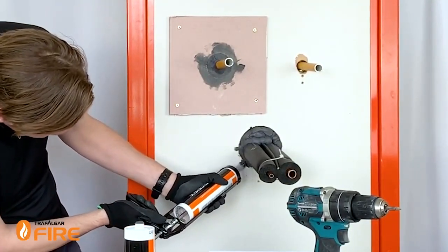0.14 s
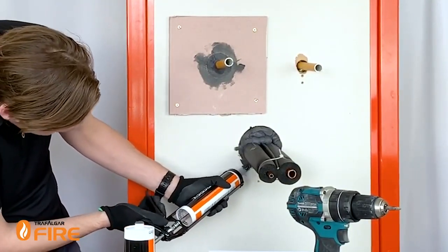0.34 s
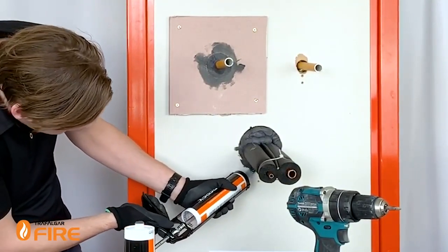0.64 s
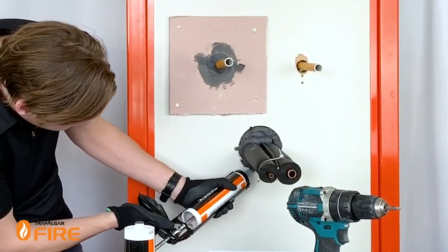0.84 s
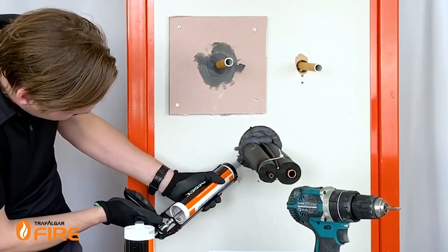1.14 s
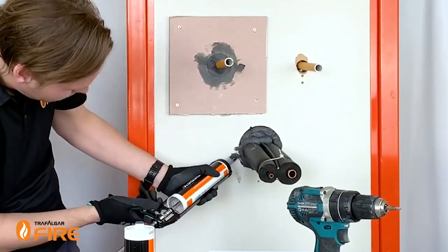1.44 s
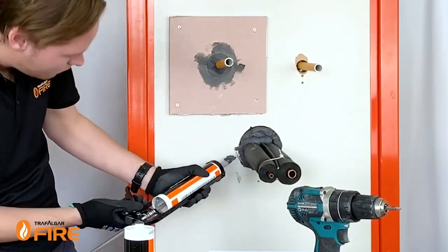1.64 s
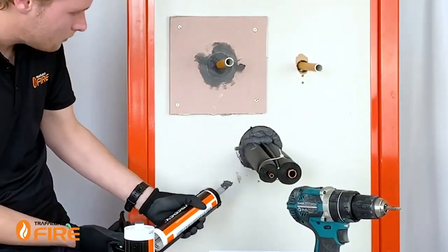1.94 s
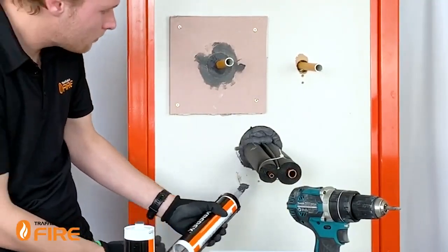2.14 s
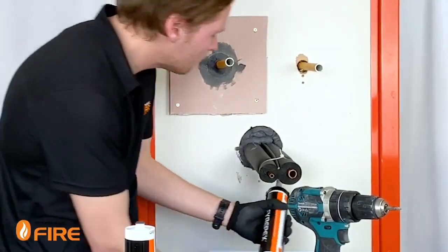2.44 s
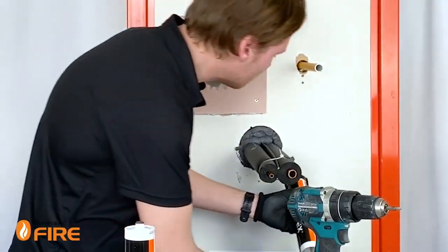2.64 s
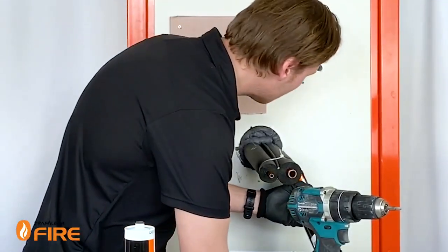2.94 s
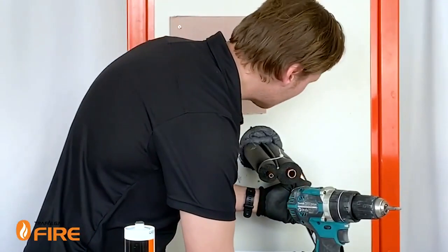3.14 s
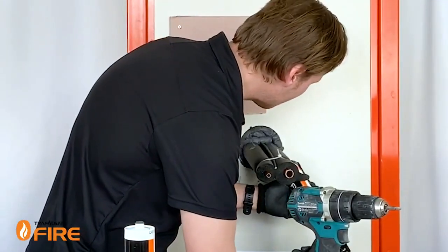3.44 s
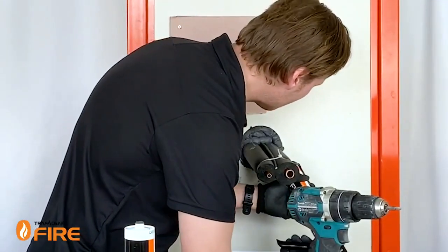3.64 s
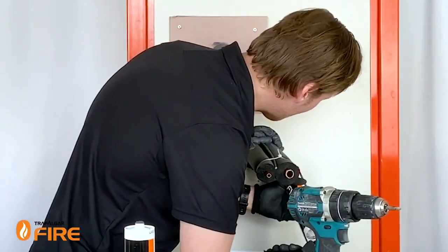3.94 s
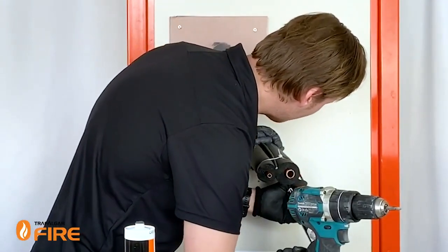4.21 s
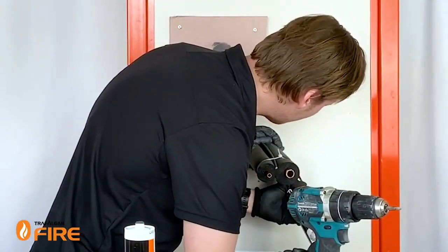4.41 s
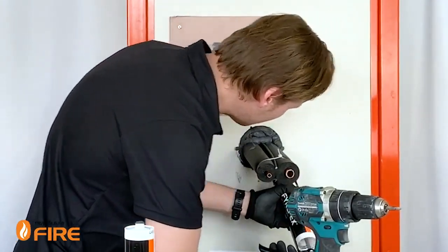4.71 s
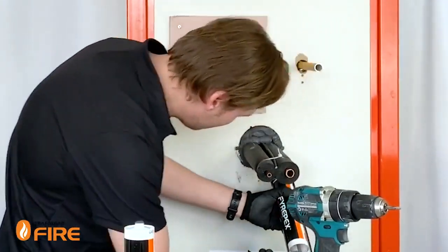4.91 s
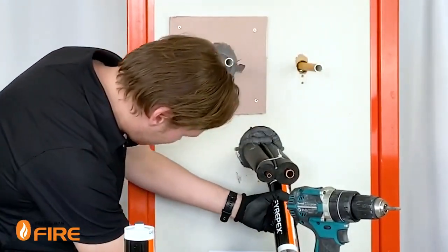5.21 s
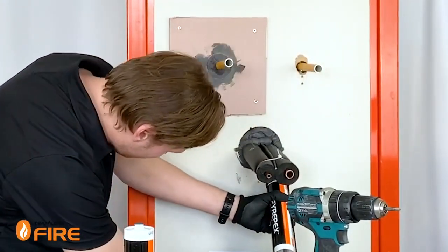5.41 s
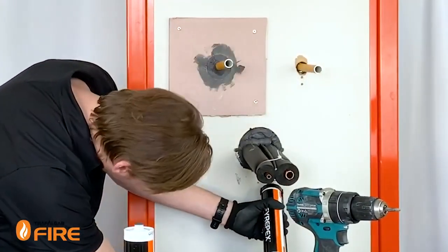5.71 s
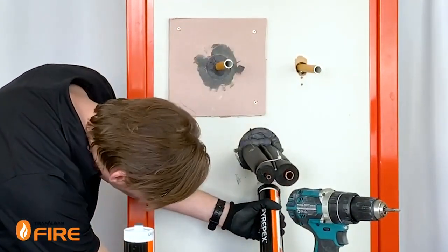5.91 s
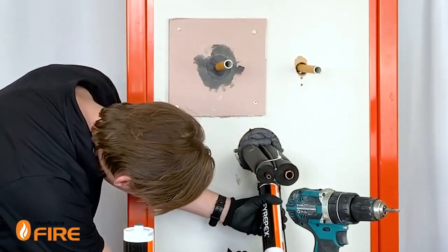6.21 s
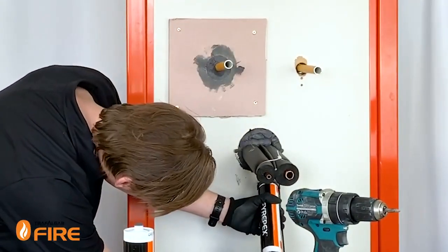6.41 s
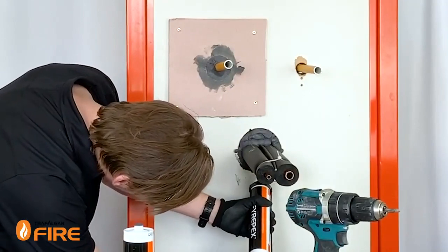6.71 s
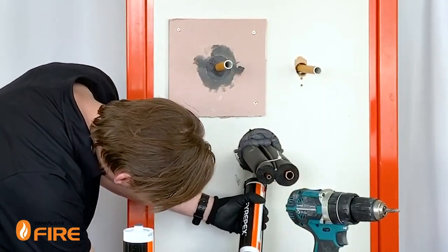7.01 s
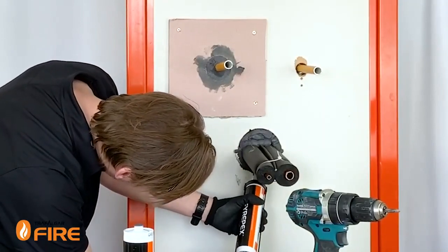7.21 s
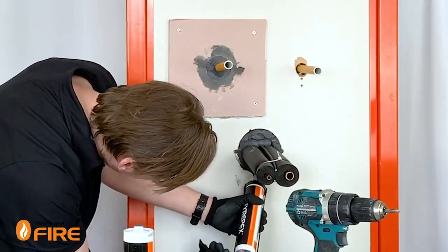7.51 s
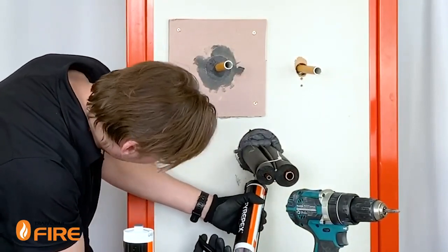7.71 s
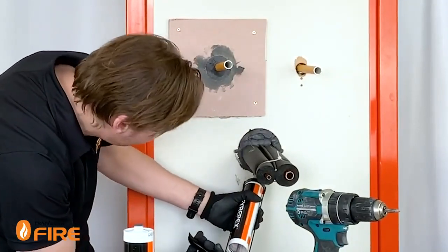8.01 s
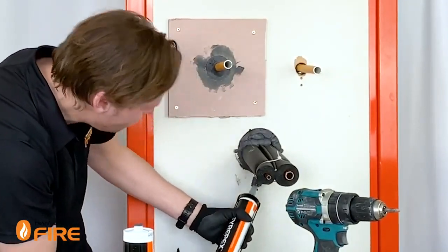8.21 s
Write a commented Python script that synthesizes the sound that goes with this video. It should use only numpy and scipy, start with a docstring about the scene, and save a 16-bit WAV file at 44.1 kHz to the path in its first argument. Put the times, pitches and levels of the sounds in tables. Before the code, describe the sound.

In a small, hard-walled workspace, a caulking gun's trigger is let go seven times; each time the steel plate skips back in two to five rapid bright clacks with a jangling metal ring. Soft glove scuffs, finger taps and rubs fill the gaps, with a dull footfall and dry knock early on. Faint ventilation rumble and hum continue beneath. The stereo microphone is close, with short room reflections.

```python
"""A hand caulking gun is squeezed and let go seven times in a small, hard-walled workspace.
At each release the trigger eases, then the spring drives the steel catch plate back along the rod in
uneven skips, to its stop: bursts of noise strike the gun's resonances, its jangling frame and steel rings.
Between releases filtered noise makes glove scuffs, taps and rubs; a gliding tone makes the rod's squeak.
Decaying modes make a footfall, a rattling burst a soft knock; shaped noise and hum make the ventilation."""
import sys
import numpy as np
from scipy import signal
from scipy.fft import rfft, irfft, next_fast_len
from scipy.io import wavfile
from scipy.ndimage import uniform_filter1d

SR = 44100
rng = np.random.default_rng(int(sys.argv[2]) if len(sys.argv) > 2 else 0)


def to_wav(sig):
    """Store sig (one row per channel, or 1-D mono) as 16-bit WAV at the path in sys.argv[1].

    Samples outside -1..1 are clipped; the rate is SR.
    """
    pcm = np.clip(np.atleast_2d(sig), -1, 1) * 32767
    pcm = np.round(pcm).astype(np.int16)
    wavfile.write(sys.argv[1], SR, pcm.T)  # frames by channels


N = 368235

# the releases; the grip and the rod's travel shift the gun's resonances from one to the next:
# [t/s, cartridge f/Hz, nozzle f/Hz, frame f/Hz, rod f/Hz, catch plate f/Hz, body level below 2 kHz/dB]
RELEASES = [(0.373, 1515, 1308, 3490, 7210, 10000, -2.5), (1.436, 984, 1688, 3606, 8000, 10780, -5),
            (3.678, 1390, 1140, 4350, 7750, 14200, 0), (4.685, 1425, 980, 3807, 7880, 12500, -2),
            (6.183, 885, 1580, 3540, 7000, 12300, -1.5), (7.432, 890, 1340, 3500, 7400, 13360, -1),
            (7.966, 880, 1830, 2900, 7780, 11250, 1.5)]


def amp(db):
    """Decibels to an amplitude factor."""
    return 10 ** (np.asarray(db) / 20)


def evened(x):
    """The same sound at rms 1."""
    return x / np.sqrt(np.mean(x ** 2) + 1e-20)


def read(points, hz):
    """A spectrum joined by straight lines on a log-frequency axis."""
    f, value = np.transpose(points)
    return np.interp(np.log(hz + 1), np.log(f + 1), value)


def add(mix, s, sound):
    """Lay a sound into the mix at s seconds, cut off at the end of the mix."""
    part = mix[max(round(s * SR), 0):][:len(sound)]
    part += sound[:len(part)]


def causal(gain_db):
    """The quickest (minimum-phase) impulse response with this gain curve, energy 1."""
    log_gain = np.log(amp(np.maximum(gain_db, gain_db.max() - 90)))
    circle = np.concatenate([log_gain, log_gain[-2:0:-1]])
    spectrum = np.exp(np.conj(signal.hilbert(circle)))
    taps = np.fft.ifft(spectrum).real[:len(gain_db)]
    return taps / np.linalg.norm(taps)


def hump(centre_hz, octaves):
    """Impulse response of one resonance, 3 dB down at the given spread to either side."""
    hz = np.fft.rfftfreq(2048, 1 / SR) + 1
    gain_db = -3 * (np.log2(hz / centre_hz) / octaves) ** 2
    return causal(np.maximum(gain_db, -50))


def ring(hz, db, t60):
    """One mode: a sine that dies by 60 dB in t60 seconds."""
    t = np.arange(SR // 3) / SR
    return amp(db) * np.exp(-np.log(1000) * t / t60) * np.sin(2 * np.pi * hz * t)


def contact(length_s):
    """Surfaces chatter for an instant as they meet: a short noise burst with an even spectrum."""
    t = np.arange(512) / SR
    shape = np.exp(-(t / length_s) ** 4)
    burst = rng.standard_normal(len(t)) * shape
    for _ in range(3):  # flatten the spectrum, then restore the shape in time
        burst = irfft(np.exp(1j * np.angle(rfft(burst)))) * shape
    return burst / np.linalg.norm(burst) * np.sqrt(length_s * SR)  # rms 1 over its length


def strike(contact_s=.0027, rattle_db=-7, rattle_s=0.01, rattles_per_s=1100):
    """Force of one strike: the landing, then a dying rattle of loose parts."""
    t = np.arange(SR // 8) / SR
    blow = contact(contact_s)
    hits = rng.standard_normal(len(t)) * (rng.random(len(t)) < rattles_per_s / SR)
    rattle = hits * np.exp(-t / rattle_s) * (t > contact_s)
    # the rattle's energy is set relative to the landing's
    force = amp(rattle_db) * rattle * np.linalg.norm(blow) / (np.linalg.norm(rattle) + 1e-9)
    add(force, 0, blow)
    return force


def swell(start_s, end_s, db, ramp_s):
    """Rise, hold and fall, in dB."""
    t = np.arange(N) / SR
    return db * np.clip(np.minimum(t - start_s, end_s - t) / ramp_s + .5, 0, 1)


def drifting(x, patch_db=3.0):
    """The air noise wavers: narrow bands swell and fade, each for a fraction of a second."""
    z = signal.stft(x, SR, nperseg=2048)[2]
    patches = uniform_filter1d(rng.standard_normal(z.shape[1:]), size=3, axis=0)  # across frequency
    patches = evened(uniform_filter1d(patches, size=9, axis=1))  # across time
    return signal.istft(z * amp(patch_db * patches), SR, nperseg=2048)[1][:, :N]


def ventilation(air_db=-44, waver=0.27, waver_hz=4, rumble_top_hz=250, balance_db=0.4):
    """Duct rumble that swells with the fans, a thin air hiss, and wavering fan hum."""
    # colour of the air noise: [f/Hz, relative level/dB]
    air_colour = [(20, -18), (42, -3.5), (60, -1.5), (115, -5), (165, -7.5), (230, -14.5), (330, -22),
                  (470, -23), (700, -34.5), (1270, -29), (1440, -22.5), (1620, -35.5), (2400, -33.5),
                  (3000, -48), (9000, -50.5), (15000, -58)]
    # how alike the air noise is at left and right: [f/Hz, likeness/1]
    air_likeness = [(50, 0.91), (130, 0.8), (290, 0.71), (640, 0.11), (1400, 0.0037)]
    # the fans' hum lines, each swelling once:
    # [f/Hz, steady level/dB, swell start t/s, swell end t/s, swell level/dB, ramp t/s]
    hum_lines = [(78.7, -57, 1.7, 3.3, 12.5, .94), (117.6, -54, 5.2, 6.1, 10, 0.24),
                 (165, -61, 7.82, 8.12, 14, .12), (55.2, -57.5, 7.9, 8.4, 7.5, .2)]
    rumble_share = 0.24  # the duct rumble takes this share of each swell's dB

    n = next_fast_len(N, True)
    hz, t = np.fft.rfftfreq(n, 1 / SR), np.arange(N) / SR
    left, other = rfft(rng.standard_normal((2, n)))
    same = np.clip(read(air_likeness, hz), -1, 1)
    right = same * left + np.sqrt(1 - same ** 2) * other
    z = np.array([left, right]) * amp(read(air_colour, hz)) * (hz > 12)
    air = irfft(z, n)[:, :N]
    rumble = irfft(z / (1 + (hz / rumble_top_hz) ** 4), n)[:, :N]
    swells_db = [swell(*row[2:]) for row in hum_lines]
    extra = amp(rumble_share * sum(swells_db)) - 1
    air = amp(air_db) * evened(drifting(air + rumble * extra))
    for (line_hz, steady_db, *_), swell_db in zip(hum_lines, swells_db):
        a, b = rng.standard_normal((2, 256))
        drift = np.interp(t * 2 * waver_hz, np.arange(len(a)), a + 1j * b)
        hum = ((1 + waver * drift) * np.exp(2j * np.pi * line_hz * t)).real
        air += amp(steady_db + swell_db) * evened(hum)
    return air * amp([[-balance_db], [balance_db]])


def footfall():
    """Heel and sole set the floor's modes ringing, each at another spot, so with other signs."""
    # heel and sole landing; a softer landing rolls off lower: [t/s, level/dB, roll-off f/Hz]
    landings = [(2.321, -38, 890), (2.329, -33, 600), (2.345, -26, 285), (2.358, -21.5, 200)]
    # the floor's modes: [f/Hz, relative level/dB, t60/s]
    floor_modes = [(55, -11.5, 0.66), (76.5, -9, 0.14), (131.3, -5, 0.2), (201, 0, 0.11), (339, 0, 0.065),
                   (465, -16, 0.072), (604, 4, 0.053)]

    out = np.zeros(N)
    low_pass = signal.butter(4, 800, fs=SR, output="sos")
    for s, level_db, top_hz in landings:
        thud = 0
        for hz, db, t60 in floor_modes:
            thud = thud + rng.choice([-1, 1]) * ring(hz, db, t60) / (1 + (hz / top_hz) ** 4)
        add(out, s, amp(level_db) * signal.sosfilt(low_pass, thud))
    return out


def snapping(snap_s=2.434, snap_db=-34, spray_db=-37):
    """One dry knock: a short rattle heard directly, and the mid-range that it throws into the room."""
    # colour of the direct knock: [f/Hz, relative level/dB]
    snap_colour = [(200, -11), (700, 0), (1400, 1), (1900, -4), (2500, 1), (3000, -12), (4000, -21),
                   (9000, -30), (14000, -26)]

    tick, spray = np.zeros(N), np.zeros(N)
    hz = np.fft.rfftfreq(2048, 1 / SR)
    force = strike(contact_s=0.0015, rattle_db=-6, rattle_s=0.0042, rattles_per_s=3000)
    add(tick, snap_s, amp(snap_db) * signal.fftconvolve(force, causal(read(snap_colour, hz))))
    add(spray, snap_s, amp(spray_db) * signal.fftconvolve(force, hump(centre_hz=1750, octaves=0.75)))
    return tick, spray


def stroke(length_s, grain_db=3.5):
    """Grainy stick-slip that swells and fades."""
    n = int(length_s * SR)
    grain = np.minimum(rng.exponential(1, SR // 2), 5)
    slips = (rng.standard_normal(SR // 2) * amp(grain_db * grain))[:n]
    return evened(slips) * signal.windows.tukey(n, .7)


def rubbing():
    """Longer strokes of sleeve and rod through one resonance each; the narrowest ones squeak."""
    # sleeve and rod rubbing or squeaking: [t/s, length/s, level/dB, centre f/Hz, spread/octaves]
    rubs = [(0.19, 0.15, -69.5, 4460, 0.39), (1.805, 0.15, -54.5, 640, 0.93),
            (1.999, 0.074, -57, 1540, 0.028), (2.265, 0.27, -62.5, 1790, 0.81),
            (2.636, 0.094, -59, 800, 0.63), (4.114, 0.18, -67.5, 3760, 0.41), (4.325, 0.18, -64, 370, 0.26),
            (5.18, 0.17, -68.5, 3403, 0.0063), (5.581, 0.13, -67.5, 1996, 0.79),
            (7.173, 0.12, -56, 910, 0.52), (7.949, 0.033, -23.5, 6200, 0.13)]

    out = np.zeros(N)
    for s, length_s, db, centre_hz, octaves in rubs:
        add(out, s, amp(db) * signal.fftconvolve(stroke(length_s), hump(centre_hz, octaves)))
    return out


def squeaking(glide_s=.005, rough=.6, rough_hz=700, octave_db=-17, fade_db=5):
    """As the gun is lifted away the rod sticks and slips in its guide: a rough squeak, falling in pitch."""
    start_s, length_s, level_db = 8.2245, .022, -44
    start_hz, end_hz = 5400, 4810

    t = np.arange(0, length_s, 1 / SR)
    hz = end_hz + (start_hz - end_hz) * np.exp(-t / glide_s)
    a, b = rng.standard_normal((2, 128))
    grip = 1 + rough * np.interp(t * rough_hz, np.arange(len(a)), a + 1j * b)
    turn = np.exp(2j * np.pi * np.cumsum(hz) / SR)
    tone = (grip * (turn + amp(octave_db) * turn ** 2)).real  # squaring gives the octave
    shape = signal.windows.tukey(len(t), .1) * amp(-fade_db * t / length_s)
    out = np.zeros(N)
    add(out, start_s, amp(level_db) * evened(shape * tone))
    return out


def tapping(contact_s=0.0026):
    """Light, damped contacts: a short burst through one broad resonance each."""
    # fingers and trigger tap the gun: [t/s, level/dB, centre f/Hz, spread/octaves]
    taps = [(0.635, -39, 1330, 0.3), (0.675, -42, 1700, 0.88), (0.683, -39, 1150, 0.34),
            (0.684, -42, 4530, 0.3), (0.698, -54, 3520, 0.56), (1.409, -41.5, 1793, 0.24),
            (3.287, -55.5, 2270, 0.6), (4.003, -56, 2200, 0.71), (4.044, -48.5, 2300, 0.69),
            (6.338, -37, 997, 0.39), (6.402, -44, 2000, 0.79), (6.425, -44.5, 2800, 0.71),
            (8.225, -39, 3460, 0.81)]

    out = np.zeros(N)
    for s, db, centre_hz, octaves in taps:
        add(out, s, amp(db) * signal.fftconvolve(contact(contact_s), hump(centre_hz, octaves)))
    return out


def drag(length_s, rise_s=0.0062, fade_db=9, slips_per_s=330, grain_db=6):
    """Separate slips of uneven size that start softly and die away."""
    t = np.arange(SR // 4) / SR
    grain = np.minimum(rng.exponential(1, len(t)), 3)
    sizes = rng.choice([-1, 1], len(t)) * amp(grain_db * grain)
    slips = sizes * (rng.random(len(t)) < slips_per_s / SR)
    slips = slips * np.minimum(t / rise_s, 1) * amp(-fade_db * t / length_s)
    return evened(slips[t < length_s])


def scuffing():
    """Crackly drags through one resonance each: the glove on the grip, the trigger before each release."""
    # the glove creaks on the grip: [t/s, level/dB, length/s, centre f/Hz, spread/octaves]
    scuffs = [(0.672, -54.5, 0.032, 2100, 0.74), (3.075, -61.5, 0.043, 2250, 0.91),
              (3.279, -54.5, 0.033, 1875, 0.73), (3.634, -56, 0.031, 2530, 0.68),
              (3.988, -53.5, 0.068, 1650, 0.83), (6.342, -55, 0.059, 1110, 0.55),
              (6.408, -56, 0.048, 2420, 0.8), (7.803, -64, .03, 3280, 0.67)]
    ease_s, ease_db, ease_hz, ease_octaves = 0.057, -62.5, 3172, 0.71  # lasts until the release

    out = np.zeros(N)
    easings = [(row[0] - ease_s, ease_db, ease_s, ease_hz, ease_octaves) for row in RELEASES]
    for s, db, length_s, centre_hz, octaves in scuffs + easings:
        add(out, s, amp(db) * signal.fftconvolve(drag(length_s), hump(centre_hz, octaves)))
    return out


def gun_body(peaks_hz, body_db, ripple_db=1.44):
    """Broad resonances of the gun, rippled by its many small, quickly damped modes: (Hz, dB)."""
    # colour of a strike on the gun: [f/Hz, relative level/dB]
    gun_colour = [(100, -34), (450, -13), (720, -12), (900, -4), (1400, -1.5), (1950, -4), (2600, -4),
                  (3500, 0), (6200, 1), (8100, 1.5), (8900, -0.5), (11000, -1.5), (15500, -2.5)]
    # how far cartridge, nozzle, frame, rod and catch plate stand out: [level/dB, half-width f/Hz]
    parts = [(12, 65), (7, 68), (5, 110), (3.5, 400), (5.5, 710)]

    hz = np.fft.rfftfreq(4096, 1 / SR)
    gain_db = read(gun_colour, hz) + body_db / (1 + (hz / 2000) ** 4)
    for peak_hz, (peak_db, width_hz) in zip(peaks_hz, parts):
        gain_db += peak_db / (1 + ((hz - peak_hz) / width_hz) ** 2)
    ripple = uniform_filter1d(uniform_filter1d(rng.standard_normal(len(hz)), size=11), size=9)
    ripple = evened(ripple - uniform_filter1d(ripple, size=50))  # keep only the fine unevenness
    return hz, gain_db + ripple_db * ripple


def jangle(t60=.14, low_hz=2800, clatter_db=3.0, clatter_s=.003):
    """The steel frame's crowded modes blur into an untuned, clattering treble decay, energy 1."""
    t = np.arange(8192) / SR
    lumps = rng.standard_normal(len(t))
    clatter = amp(clatter_db * np.interp(t / clatter_s, np.arange(len(t)), lumps))
    shape = np.exp(-np.log(1000) * t / t60) * clatter
    x = rng.standard_normal(len(t)) * shape
    for _ in range(6):  # even out the spectrum and restore the decay in turn
        x = irfft(np.exp(1j * np.angle(rfft(x))))
        x *= shape / np.sqrt(abs(uniform_filter1d(x ** 2, size=64)) + 1e-14)
    x = signal.sosfilt(signal.butter(4, low_hz, "high", fs=SR, output="sos"), x)
    return x / np.linalg.norm(x)


def rising_noise(length_s=0.021, rise_db=26):
    """A short noise whose level climbs steadily in dB up to the release."""
    n = int(length_s * SR)
    return rng.standard_normal(n) * amp(np.linspace(-rise_db, 0, n))


def release(row, steel_db=-36.0, jangle_db=-2.5, rising_db=-39):
    """A rising noise, then strikes that each ring the frame differently: a list of (start s, sound)."""
    # the catch plate striking the rod and its stop:
    # [t/s, level/dB, treble tilt above 5 kHz/(dB per octave)]
    strikes = [(0.3742, -17, -1.5), (0.3886, -15.5, -2), (0.4023, -23, -4), (0.4177, -19, -5.5),
               (1.4356, -23.5, -7), (1.442, -18.5, -7), (1.4555, -13, -2.5), (1.468, -9.5, 1.5),
               (3.6791, -19, -4), (3.687, -12, 1), (3.6943, -18, -1), (4.687, -19, -5), (4.696, -14.5, 1),
               (4.7005, -16.5, -1.5), (6.183, -29, -9), (6.188, -22, -4.5), (6.1924, -17, 0.5),
               (6.1994, -15, 0.5), (6.208, -21.5, 4), (7.434, -19.5, -3.5), (7.4469, -15, -1),
               (7.457, -12, -1), (7.4626, -14.5, 1.5), (7.4712, -11.5, 2), (7.4753, -23.5, 2),
               (7.9634, -9, 2), (7.9682, -20.5, -4.5)]
    # short rings of the spring and rod: [f/Hz, relative level/dB, t60/s]
    steel_modes = [(894, -10.5, 0.16), (1450, -4, 0.15), (2130, -8.5, 0.18), (3490, -4.5, 0.1),
                   (3620, -6, .1), (4300, -9, 0.12), (5450, -7.5, 0.14), (6160, -5.5, 0.16),
                   (8150, -5.5, 0.16)]

    start_s, *peaks_hz, body_db = row
    hz, gain_db = gun_body(peaks_hz, body_db)
    rise = rising_noise()
    rings = sum(ring(*mode) * rng.uniform(0.38, 1) for mode in steel_modes)
    steel = amp(steel_db) * rings / len(steel_modes)
    rising_band = signal.fftconvolve(rise, hump(centre_hz=5460, octaves=0.28))
    sounds = [(start_s - len(rise) / SR, amp(rising_db) * rising_band)]
    for s, db, tilt_db in strikes:
        if abs(s - start_s) < .2:  # the strikes of this release
            octaves_up = np.log2(np.maximum(hz / 5000, 1))
            body = causal(gain_db + tilt_db * octaves_up)
            response = signal.fftconvolve(amp(jangle_db) * jangle(), body)
            add(response, 0, body)
            add(response, 0, steel)
            sounds.append((s, amp(db) * signal.fftconvolve(strike(), response)))
    return sounds


def room(x, direct_db, tail_db=-1.5, build_s=0.00065, beam_hz=3000):
    """Mostly treble arrives directly; wall echoes and a dense tail follow, all later at the left port."""
    # decay of the tail: [f/Hz, t60/s]
    room_decay = [(200, 0.63), (1300, 0.28), (3500, 0.37), (6000, 0.36), (9200, 0.26), (15000, 0.2)]
    # wall echoes against the direct sound: [delay t/s, level/dB]
    wall_echoes = [(.0046, -7), (.0075, -16.5), (0.0126, -10), (0.0212, -19)]
    # likeness of the wall sound at the two ports, the lag aside: [f/Hz, likeness/1]
    walls_likeness = [(300, .6), (600, 0.7), (1100, .35), (1600, -0.083), (2300, -.85), (4600, -.25),
                      (7000, 0.61), (9000, 1), (15000, .7)]
    port_lag_s = .000214

    n = SR // 2
    hz, t, z = signal.stft(rng.choice([-1., 1.], (2, n)), SR, nperseg=256)
    decay = np.exp(-np.log(1000) * t / read(room_decay, hz)[:, None])
    tail = signal.istft(z * decay, SR, nperseg=256)[1][:, :n]
    tail *= 1 - np.exp(-(np.arange(n) / SR / build_s) ** 2)
    walls = amp(tail_db) * tail / np.linalg.norm(tail, axis=1, keepdims=True)
    high_pass = signal.butter(1, beam_hz, "high", fs=SR)
    ray = amp(direct_db) * signal.lfilter(*high_pass, signal.unit_impulse(64))
    for paths in walls:
        for delay, db in wall_echoes:
            add(paths, delay + rng.uniform(-0.0003, .0003), amp(db) * ray)
    hz = np.fft.rfftfreq(n, 1 / SR)
    direct = rfft(ray, n)
    right, other = rfft(walls)
    same = np.clip(read(walls_likeness, hz), -1, 1)
    left = direct + same * right + np.sqrt(1 - same ** 2) * other
    left = left * np.exp(-2j * np.pi * hz * port_lag_s)
    response = irfft(np.array([left, direct + right]), n)[:, :n * 4 // 5]
    return signal.oaconvolve(x[None], response, axes=1)


def scene(foot_room_db=-11, snap_room_db=-4, hands_direct_db=-2, gun_direct_db=1.0):
    """Gun through the room, hands' small noises more diffusely; footfall and knock arrive drier."""
    foot = footfall()
    snap, spray = snapping()
    small = scuffing() + tapping() + squeaking() + rubbing() + spray
    small = small + amp(foot_room_db) * foot + amp(snap_room_db) * snap
    out = foot + snap + room(small, hands_direct_db)[:, :N] + ventilation()
    for row in RELEASES:
        for start, sound in release(row):
            # each part radiates its own way, so each strike finds other paths
            for port, heard in zip(out, room(sound, gun_direct_db)):
                add(port, start, heard)
    return out


def record(dry):
    """The loudest peaks clip at full scale; then a low-pass limits the band."""
    edge_hz = 16000
    band_limit = signal.firwin(511, edge_hz, window=("kaiser", 9), fs=SR)
    return signal.oaconvolve(np.clip(dry, -1, 1), band_limit[None], "same")


dry = scene()
out = record(dry)
to_wav(out)
```